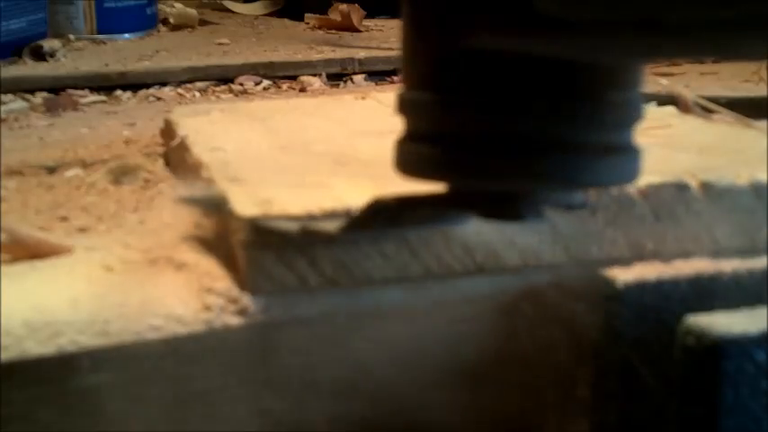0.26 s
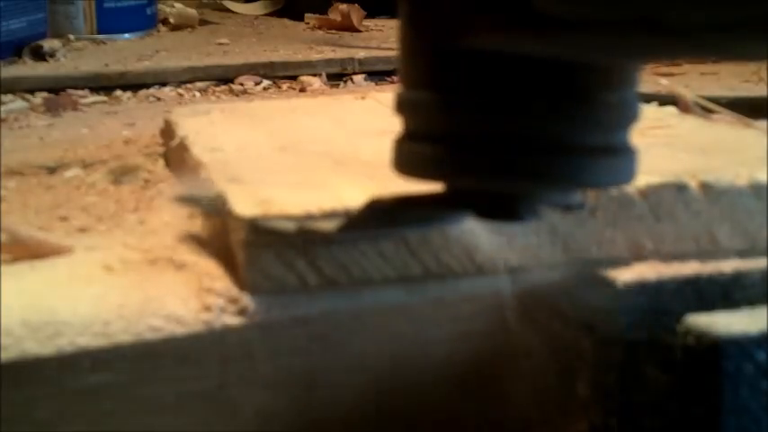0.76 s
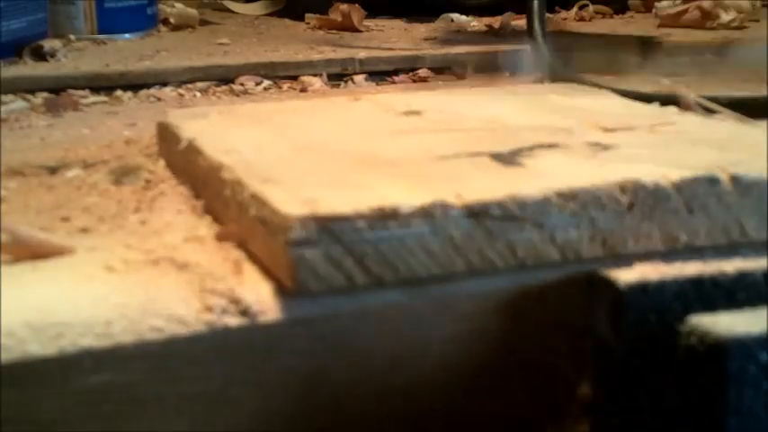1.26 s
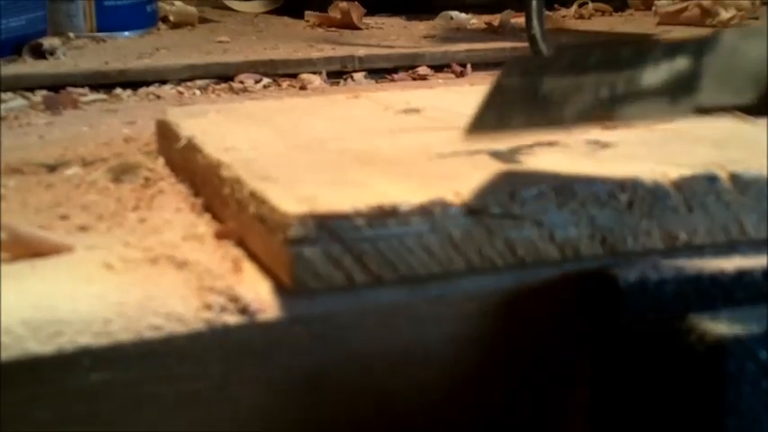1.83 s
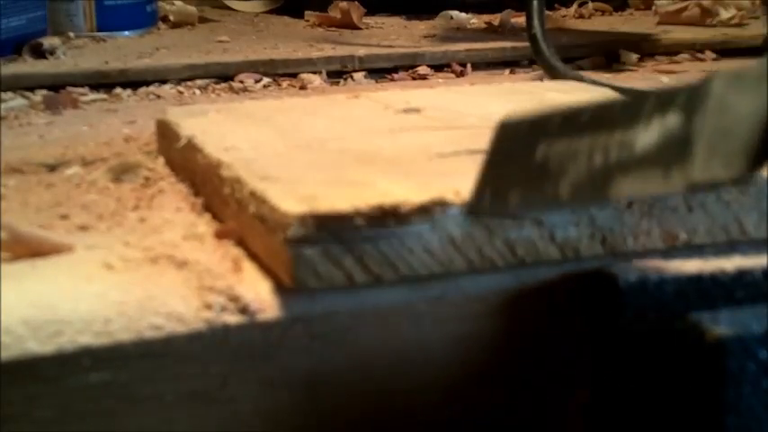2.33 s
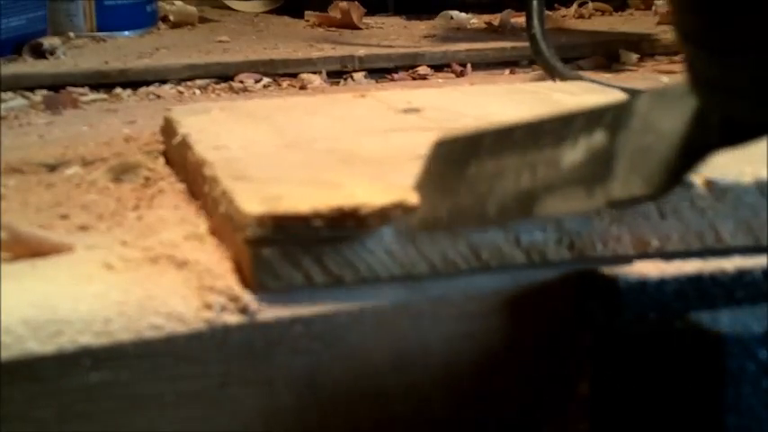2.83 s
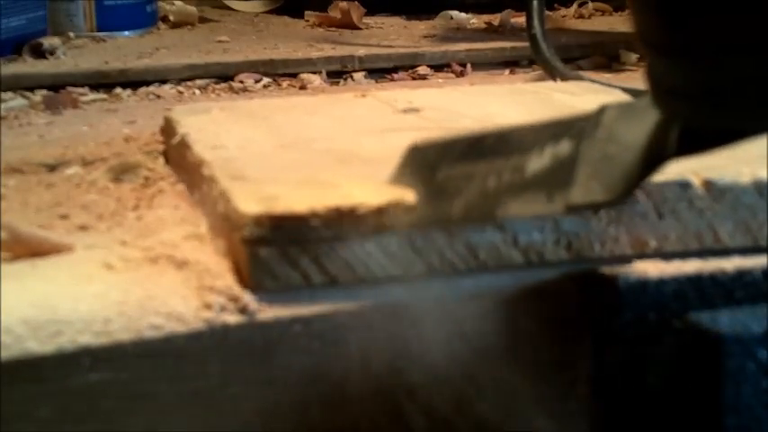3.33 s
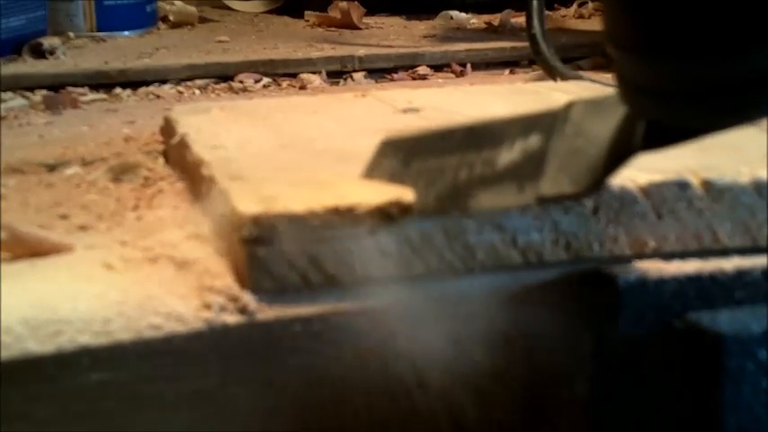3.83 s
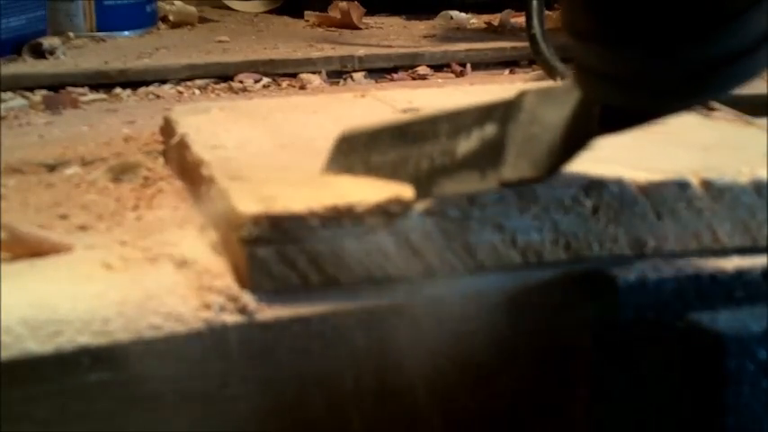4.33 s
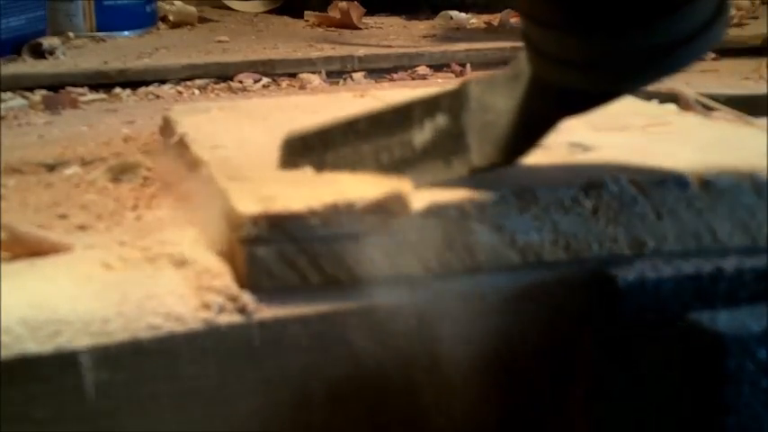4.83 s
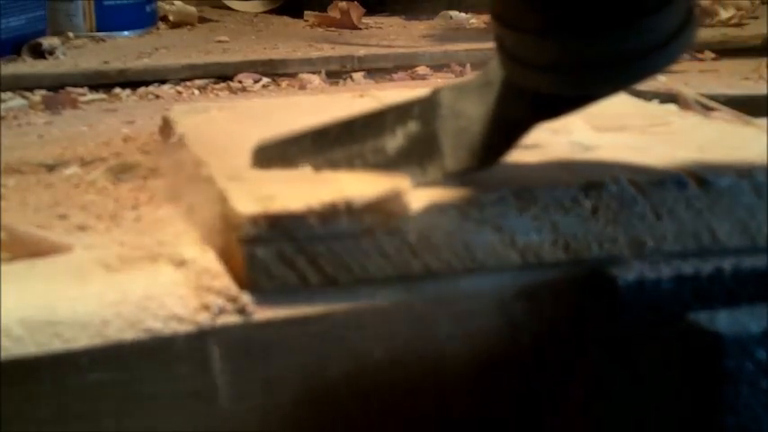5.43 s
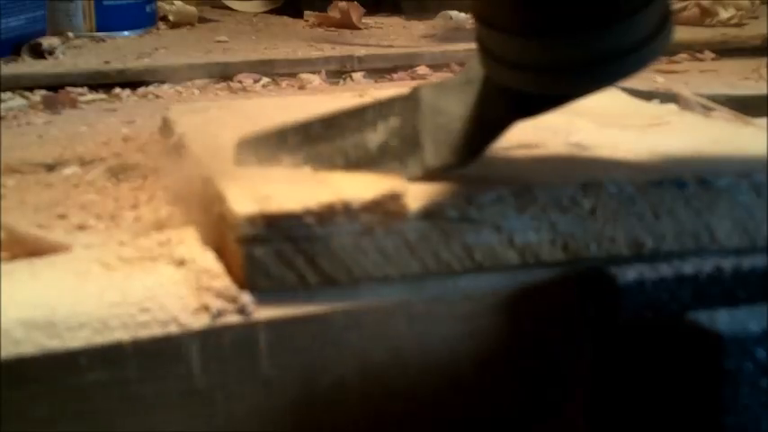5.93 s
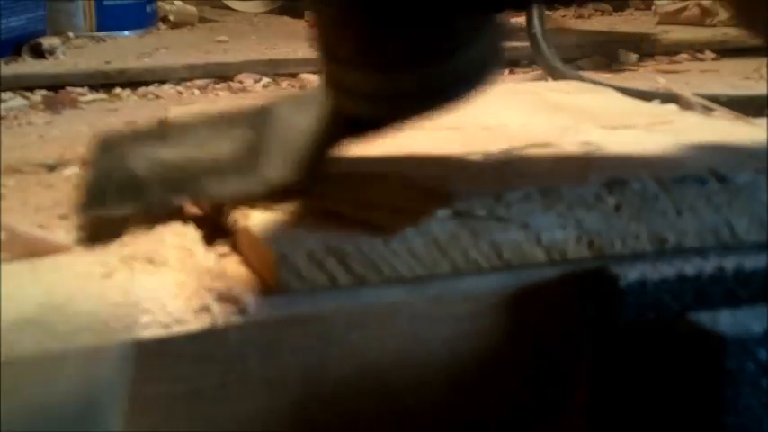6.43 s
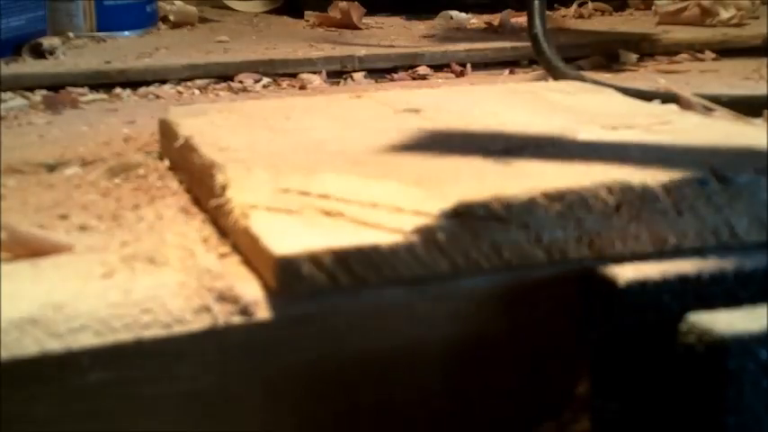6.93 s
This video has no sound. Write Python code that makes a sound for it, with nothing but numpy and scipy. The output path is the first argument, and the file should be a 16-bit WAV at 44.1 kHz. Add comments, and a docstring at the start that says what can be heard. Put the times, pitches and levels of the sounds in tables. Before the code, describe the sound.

A handheld power saw on a workshop bench, recorded dry and near: buzzing teeth and torn wood fibres, a short burst of low wind buffeting, smooth motor whine with rushing fan air, then a long chattering cut with metallic blade ring and loose slapping. The motor sags under pressure, races once clear, and finally falls in pitch after switch-off.

```python
"""An oscillating multi-tool saws a wooden block in three passes, close to the microphone: one from the side, then,
after the tool is lifted past the microphone and its cooling air buffets the port, a plunge and a deeper cut.
Motor orders hum and whine over fan noise, and the motor sags under load; at each stroke the teeth bite, with
torn fibres, ringing blade and wood, and slaps of the loose blade. Last, the tool is switched off and coasts down."""
import sys
import numpy as np
from scipy import signal
from scipy.fft import rfft, irfft, next_fast_len
from scipy.io import wavfile

SR = 44100
rng = np.random.default_rng(int(sys.argv[2]) if len(sys.argv) > 2 else 0)


def master(y):
    """Save y as 16-bit WAV."""
    cut = np.clip(np.atleast_2d(y).T, -1, 1)
    pcm = np.round(cut * 32767)  # scale
    wavfile.write(sys.argv[1], SR, pcm.astype(np.int16))


N = 316189
T = np.arange(N) / SR  # seconds

OFF_S = 6.842  # the switch is released
WHINE_RISE_S, WHINE_FALL_S = 0.026, 0.052  # widths of the soft edges of a swell
STROKE_SMEAR, SMEAR_PER_ORDER = 0.15, 0.011  # scatter in the timing of the orders (cycles); less makes a sharper pulse

# the blade skips, catching unevenly from stroke to stroke: start_s, stop_s, half_order_shift_db
SKIPS = [(0.194, 0.246, 4.5), (3.447, 4.232, 1), (4.398, 4.67, 3.5), (5.467, 6.278, -2.5)]


def gain_of(db):
    """Decibels to amplitude."""
    return np.exp(np.asarray(db) * np.log(10) / 20)


def evened(x):
    """Scales to rms 1."""
    return x / np.sqrt(np.mean(x ** 2) + 1e-20)


def follow(rows):
    """Each column of a curve table, sample by sample."""
    s, *columns = np.transpose(rows)
    return [np.interp(T, s, c) for c in columns]


def read(points, hz):
    """Gain of a short spectrum at the given frequencies, joined on a log frequency scale."""
    f, db = np.transpose(points)
    return gain_of(np.interp(np.log(hz + 1), np.log(f), db))


def filtered(x, response):
    """Applies a gain given as a function of frequency."""
    size = next_fast_len(N + 4096)
    spectrum = rfft(x, size) * response(np.fft.rfftfreq(size, 1 / SR))
    return irfft(spectrum, size)[:N]


def below(x, edge_hz):
    """Steep low-pass."""
    return filtered(x, lambda hz: 1 / (1 + (hz / edge_hz) ** 12))


def wander(rate):
    """Smooth chance of rms 1 that takes a new value rate times a second."""
    return evened(np.interp(T * rate, np.arange(16384), rng.standard_normal(16384)))


def contact(start, stop, release):
    """1 while the teeth are in the wood during one pass, else 0; they catch within 10 ms and ease off over release."""
    return np.clip(np.minimum((T - start) / .01, (stop - T) / release) + .5, 0, 1)


def swell(start, stop):
    """Rises before start, holds at 1, and fades after stop."""
    rise = (np.maximum(start - T, 0) / WHINE_RISE_S) ** 2
    fall = (np.maximum(T - stop, 0) / WHINE_FALL_S) ** 2
    return np.exp(-rise - fall)


def bump(s, width):
    """A bell of height 1 around one moment."""
    return np.exp(-((T - s) / width) ** 2)


def partial(turns, order):
    """One multiple of the shaft rotation, rms 1; low orders peak near one moment, so each stroke is a soft pulse."""
    scatter = STROKE_SMEAR + SMEAR_PER_ORDER * order
    return np.sqrt(2) * np.cos(2 * np.pi * (order * turns + scatter * rng.standard_normal()))


def saw(turns, load, cut, ring, jitter, skip_db, chatter_db, teeth_db):
    """One pass: the teeth bite at each stroke, a little early or late, and tear fibres in bursts."""
    # torn fibres against clean bites; grittiest for a moment early in the first pass
    # and midway through the last: time_s, grit_db
    grit_curve = [(0.13, 1), (0.21, 7.5), (0.3, 1), (0.55, 1), (0.85, -3), (3.3, 4), (3.6, -0.5), (4.6, 2),
                  (4.85, 3.5), (5.35, 0), (5.6, 6.5), (6.3, 3)]
    # the teeth catch (+) or slip (-): time_s, half_length_s, wood_db, blade_db
    catches = [(0.19, 0.018, -10, 1), (0.227, 0.034, 5.5, 5), (0.556, 0.45, -2, -3), (4.52, 0.37, 1.5, -2),
               (4.683, 0.066, 3, 4), (5.06, 0.99, -3.5, -0.5), (5.825, 0.27, 7, -1),
               (6.022, 0.071, -7.5, -14), (6.192, 0.14, 3.5, 0), (6.293, 0.014, -26, 5),
               (6.316, 0.016, -1.5, 6)]
    knock_growth, rasp_growth, ring_growth = 2.3, 2, -0.5  # dB per doubling of load
    skip_waver_db = 1.5
    bounce_rate = 19  # typical bounces of the tool in the cut per second
    start, stop, release, block_db, kerf_db, blade_db = cut

    stroke = turns + jitter * wander(420)
    # the grip on the blade keeps changing, so single orders surge and fade
    bites = evened(sum(partial(stroke, k) * gain_of(2.5 * np.tanh(wander(14))) for k in range(2, 27)))
    # a blade that catches harder on every second stroke adds half orders
    skips = evened(bites * np.cos(np.pi * stroke))
    skipping_db = skip_waver_db * wander(2.9) + sum(db * swell(first, last) for first, last, db in SKIPS)

    burst = np.exp(0.85 * np.cos(2 * np.pi * turns))
    grit = rng.standard_normal(N) * burst * gain_of(2.5 * np.tanh(wander(500)))
    # torn fibres have little bass
    grit = evened(filtered(grit, lambda hz: np.hypot(hz, 900) / np.hypot(hz, 3000)))
    tearing = gain_of(follow(grit_curve)[0])
    drive = (bites + gain_of(skip_db + skipping_db) * skips + tearing * grit) / np.hypot(1, tearing)

    sound = filtered(drive, lambda hz: read(ring, hz))
    low, mid, high = (below(sound, edge_hz) for edge_hz in (1450, 3050, 4200))
    # the wood gets louder with load, while the blade rings much the same at any pressure
    doublings = np.log2(load)
    wood, steel = sum(np.outer(dbs, bump(s, width)) for s, width, *dbs in catches)
    block = block_db + knock_growth * doublings + wood
    kerf = kerf_db + rasp_growth * doublings + 0.54 * wood
    blade = blade_db + ring_growth * doublings + steel
    # the hand-held tool bounces in the cut at an uneven rate, which makes the ringing stutter
    bounces = np.cumsum(bounce_rate * np.exp(.5 * wander(25))) / SR
    chatter = chatter_db * np.sin(2 * np.pi * bounces)

    out = evened(low) * gain_of(block)
    out += evened(mid - low) * gain_of(kerf + 1.85 * chatter)
    out += evened(high - mid) * gain_of(blade + chatter)
    out += evened(sound - high) * gain_of(kerf + teeth_db + chatter)
    return out * np.sqrt(contact(start, stop, release))


def rattle(turns):
    """The loose blade slaps the kerf once a stroke, unevenly; each slap rings briefly in blade or wood."""
    # spells of slapping and the resonance they set ringing: start_s, stop_s, resonance_hz, width_hz, level_db
    rattles = [(0.206, 0.303, 2900, 1300, -32), (2.407, 2.55, 3670, 200, -35),
               (2.717, 3.273, 3610, 300, -33), (3.27, 3.31, 2660, 220, -29.5),
               (3.328, 3.37, 3670, 300, -26), (3.366, 3.41, 2660, 216, -33), (3.62, 4.62, 3550, 810, -34.5),
               (4.62, 6.27, 2906, 1130, -36.5), (4.614, 5.56, 4720, 700, -35),
               (4.777, 5.25, 2585, 220, -41), (5.25, 6.2, 3530, 547, -35.5),
               (5.05, 5.357, 10800, 1500, -61.5), (6.31, 6.33, 2820, 1100, -30)]
    spread_db, clump_db, clump_rate = 3, 4.5, 45  # slaps differ in strength and come in clumps (changes per second)
    scatter = 0.015  # unevenness of timing (strokes)
    strokes = np.floor(np.maximum.accumulate(turns + scatter * wander(420)))
    size_db = spread_db * np.tanh(rng.standard_normal(N)) + clump_db * np.tanh(wander(clump_rate))
    slaps = np.diff(strokes, prepend=strokes[0]) * gain_of(size_db)

    out = np.zeros(N)
    for start, stop, f, width, db in rattles:
        def resonance(hz):
            """A band-pass applied twice, with the treble above it rolled off."""
            band = 1j * hz * width / (f * f - hz * hz + 1j * hz * width)
            return band ** 2 / (1 + (hz / (2 * f)) ** 6)
        out += gain_of(db) * evened(filtered(slaps, resonance)) * contact(start, stop, 0.033)
    return out


def rocking(turns):
    """While the blade skips, the block rocks at half the stroke rate; as the kerf opens it drones below the hum."""
    # rocking at 1/2, 3/2 and 5/2 of the stroke rate, before the shift of each skip: level_db
    rock_levels = (-62.5, -58.5, -51)
    # the drone as the kerf opens: start_s, stop_s, level_db
    drone = (2.6, 2.78, -57)
    level = sum(gain_of(db) * swell(start, stop) for start, stop, db in SKIPS)
    halves = level * sum(gain_of(db + 1.2 * wander(25)) * partial(turns, k + .5)
                         for k, db in enumerate(rock_levels))
    start, stop, db = drone
    return halves + gain_of(db) * swell(start, stop) * partial(turns, 2 / 3)


def motor(speed, turns, shade_db, grip):
    """Orders of the motor; the drive swings to and fro, which favours odd orders, and bearing play makes them waver."""
    # hum at the stroke rate: time_s, level_db
    hum = [(0, -42.5), (0.8, -42), (1.3, -42.5), (2.85, -45), (3.25, -59), (4.6, -51.5), (4.85, -51),
           (5.75, -44.5), (6.22, -50), (6.29, -51), (6.38, -45), (7.17, -51)]
    # weaker orders, raised by a housing resonance near 3.7 kHz: pitch_hz, odd_order_level_db (before the shifts below)
    gears = [(520, -87), (700, -45), (900, -52), (1300, -55.5), (2100, -57), (2500, -43.5), (3100, -48.5),
             (3700, -37.5), (4700, -43), (5850, -55), (6600, -52), (7700, -62.5), (9400, -82), (11000, -74),
             (15000, -88)]
    # one order sings out as the tool is turned or leant on: start_s, stop_s, order, level_db
    whines = [(0.0, 0.133, 6, -40), (0.0, 0.146, 8, -29.5), (0.262, 0.438, 6, -41), (0.266, 0.417, 8, -31),
              (0.31, 0.383, 13, -32.5), (0.446, 0.567, 9, -34), (0.48, 0.59, 14, -32),
              (0.63, 0.765, 8, -31), (0.636, 0.79, 12, -33.5), (0.843, 0.93, 13, -29.5),
              (1.205, 2.353, 9, -40), (1.203, 1.28, 11, -35), (1.344, 2.373, 11, -31),
              (1.748, 2.383, 21, -41.5), (1.8, 2.8, 30, -62.5), (1.35, 2.8, 34, -69), (2.51, 2.56, 11, -31),
              (4.355, 4.503, 4, -43), (4.687, 4.75, 9, -34), (4.848, 5.2, 9, -41.5), (5.92, 6.017, 9, -35),
              (5.996, 6.11, 13, -33), (6.335, 6.54, 11, -31), (6.283, 6.4, 13, -32.5),
              (6.425, 6.603, 22, -46.5), (6.42, 6.6, 30, -61), (6.6, 6.747, 7, -37.5),
              (6.438, 6.846, 12, -34.5), (6.66, 6.878, 13, -28)]
    # each coasting order flares as it sinks through a housing resonance: resonance_hz, width_hz, boost_db
    housing = [(1750, 220, 13), (2670, 180, 7), (3610, 390, 17.5)]
    waver_db, even_db, damped_db, jolt_db = 5.5, -3.5, -9, 4.5
    flutter, cut_flutter = 0.018, 0.2  # flicker of the whines, and what the wood adds: shares of their level
    shake = 0.0015  # turns
    fan_blades, fan_tone_db = 21, -54.5
    coast_db = -4  # unpowered, the slack drive is quieter
    sizzle_order, sizzle_width, sizzle_db = 46, 5, 10  # these orders stand out and sweep down in the coast

    hum_db, = follow(hum)
    shaken = turns + shake * grip * wander(160)  # the wood jolts the drive and smears the high orders
    out = gain_of(hum_db + .5 * jolt_db * grip * wander(35)) * partial(shaken, 1)
    coasting = swell(OFF_S, T[-1])
    for k in range(2, 53):
        hz = k * speed
        treble = hz > 5300
        slack_db = coast_db + sum(db * np.exp(-((hz - f) / width) ** 2) for f, width, db in housing if k < 20)
        slack_db += sizzle_db * np.exp(-((k - sizzle_order) / sizzle_width) ** 2)
        shift_db = shade_db * treble + even_db * (k % 2 == 0) * (1 + 2 * coasting)
        # load takes up the play in the drive and quiets its weaker orders
        shift_db += damped_db * grip + slack_db * coasting
        level = read(gears, hz) * gain_of(waver_db * np.tanh(wander(7)) + shift_db)
        if k == fan_blades:
            level = np.hypot(level, gain_of(fan_tone_db + shade_db))
        sung = [gain_of(db) * swell(start, stop) for start, stop, order, db in whines if round(order) == k]
        if sung:
            whine = sum(sung) * gain_of(jolt_db * grip * np.tanh(wander(35)))
            flicker = 1 + (flutter + cut_flutter * grip) * wander(110)
            level = np.hypot(level, whine) * flicker
        out += level * partial(shaken, k)
    return out


def fan(turns, shade_db, rattle_depth=0.2, knock_depth=0.2):
    """Rushing air and gear rattle, which throbs two and four times a turn as the drive reverses."""
    # colour of the cooling fan's rush: pitch_hz, relative_level_db_per_hz
    rush_colour = [(100, -18.5), (300, -16), (700, -5), (1600, -0.5), (2200, -0.5), (3600, 5.5),
                   (4500, 5.5), (4900, 4.5), (5400, -5.5), (6700, -9.5), (7700, -25), (9400, -22.5),
                   (12000, -25.5), (15000, -40)]
    # loudness of the rush, before the treble is shaded: time_s, level_db
    rush_curve = [(0, -32.5), (0.55, -44.5), (0.85, -31), (1.06, -38), (1.28, -30.5), (1.8, -34),
                  (2.7, -33.5), (3.2, -35), (5.25, -36), (5.7, -32.5), (6.4, -34.5), (7.17, -35.5)]
    throb = 1 + rattle_depth * np.cos(4 * np.pi * turns) + knock_depth * np.cos(8 * np.pi * turns)
    noise = rng.standard_normal(N) * throb * gain_of(1.1 * wander(240))
    rush_db, = follow(rush_curve)
    rush = evened(filtered(noise, lambda hz: read(rush_colour, hz))) * gain_of(rush_db)
    dull = below(rush, 5500)
    return dull + (rush - dull) * gain_of(shade_db)


def draught():
    """Lumpy turbulence of cooling air on the port: only strong gusts reach far beyond the bass; a pop breaks out in one."""
    # cooling air sweeps over the microphone: start_s, stop_s, level_db
    gusts = [(0, 0.057, -39), (0.05, 0.85, -52.5), (0.933, 0.95, -19.5), (0.955, 1.015, -24),
             (1.025, 1.097, -27), (1.093, 1.153, -22.5), (1.174, 1.16, -24.5), (1.606, 1.6, -44),
             (6.84, 7, -48)]
    # colour of the turbulence: pitch_hz, relative_level_db_per_hz
    buffet = [(15, 0.5), (40, 2.5), (100, -8), (200, -10.5), (400, -17), (900, -26.5), (2000, -54),
              (5000, -64)]
    rise, fall = 259, 221  # dB per second
    pop_s, pop_db, pop_length_s = 1.1326, -10.5, 0.00033  # one sharp pop of air on the port

    slopes_db = [db - rise * np.maximum(start - T, 0) - fall * np.maximum(T - stop, 0)
                 for start, stop, db in gusts]
    level_db = np.max(slopes_db, axis=0)
    eddies = evened(filtered(rng.standard_normal(N), lambda hz: read(buffet, hz)))
    bass = below(eddies, 160)
    fine = eddies - bass
    force = np.clip(gain_of((level_db + 8.0) * 0.29), 0, 1)
    out = (2 * np.tanh(bass / 2) + fine * force * gain_of(6.2 * wander(90))) * gain_of(level_db)
    u = np.maximum(T - pop_s, 0) / pop_length_s
    return out - gain_of(pop_db) * u * np.exp(1 - u) * (1 - u / 3)


def scene():
    """One shaft drives motor, fan and blade; it sags with load and coasts down once switched off."""
    # speed under power, sagging as the blade is pressed into the wood: time_s, strokes_per_s
    speed_curve = [(0.0, 292.1), (0.08, 295.4), (0.21, 279.5), (0.36, 295.1), (0.52, 272.0), (0.65, 286.5),
                   (0.76, 288.6), (0.91, 306.0), (1.6, 309.0), (2.4, 309.0), (2.78, 304.0), (2.98, 297.3),
                   (3.11, 300.5), (3.28, 293.5), (3.49, 297.1), (4.3, 293.2), (4.44, 297.5), (4.68, 284.0),
                   (4.87, 279.0), (5.06, 289.2), (5.17, 284.0), (5.37, 282.3), (5.58, 287.2), (5.87, 286.0),
                   (6.0, 281.0), (6.16, 295.5), (6.26, 283.0), (6.37, 305.0), (6.47, 310.0), (6.84, 308.1)]
    # blade passes, levels at full load: start_s, stop_s, easing_off_s, block_knock_db, kerf_rasp_db, blade_ring_db
    passes = [(-0.05, 0.86, 0.087, -41, -33, -34.5), (2.4, 4.62, 0.021, -42.5, -34, -31.5),
              (4.62, 6.335, 0.0082, -41.5, -33.5, -38.5)]
    # how blade and wood ring in each pass: pitch_hz, relative_level_db_per_hz
    ring_side = [(150, -62), (580, -12.5), (850, -9.5), (1450, -5), (1720, 1), (2020, 2), (2420, 5),
                 (3080, -9.5), (3550, -7.5), (4900, -20.5), (5500, -32), (6700, -30), (7700, -44),
                 (15000, -50)]
    ring_plunge = [(150, -46), (750, 5), (1200, -4), (2100, -2.5), (2650, 1), (3200, 1.5), (3550, 5.5),
                   (3850, 5.5), (4700, -11.5), (5800, -50), (6700, -15.5), (7700, -40), (15000, -52)]
    ring_deep = [(60, -25), (200, -9.5), (850, -7.5), (1150, -3), (1700, -10), (2250, 1), (2600, 3.5),
                 (3100, 3), (3550, 13), (4750, 6), (5500, -13.5), (6800, -16), (7700, -25), (10500, -26.5),
                 (15000, -47)]
    free_speed, full_sag = 310, 20  # strokes per second
    coast_s = 0.955  # time constant of the slowing
    wobble_hz, wobble_rate = 1.0, 16  # the speed wobbles during the plunge: depth, and changes per second
    treble_db, treble_loaded_db = 2.5, -1.5  # treble of the free-running tool, and its change at full load
    swing_s, swing_width_s, swing_shade_db = 1.04, 0.15, -11.5

    side, plunge, deep = passes
    powered, = follow(speed_curve)
    speed = powered * np.exp(-np.maximum(T - OFF_S, 0) / coast_s)
    speed += wobble_hz * wander(wobble_rate) * contact(*plunge[:3])
    turns = np.cumsum(speed) / SR
    load = np.maximum(free_speed - powered, 1) / full_sag
    grip = 0.6 * contact(*side[:3]) + contact(*plunge[:3]) + contact(*deep[:3])
    # the tool's body shades its treble as it swings past the microphone
    shade_db = treble_db + treble_loaded_db * load + swing_shade_db * bump(swing_s, swing_width_s)

    # jitter in strokes
    out = saw(turns, load, side, ring_side, jitter=0.003, skip_db=-11.5, chatter_db=0.2, teeth_db=-4.0)
    out += saw(turns, load, plunge, ring_plunge, jitter=0.0026, skip_db=-14, chatter_db=0.83, teeth_db=2.0)
    out += saw(turns, load, deep, ring_deep, jitter=0.0073, skip_db=-15.5, chatter_db=0.8, teeth_db=-1.0)
    out += rattle(turns) + rocking(turns)
    out += motor(speed, turns, shade_db, grip) + fan(turns, shade_db)
    return (out + draught())[None]


def record(dry):
    """The microphone port cuts narrow nulls into the treble; then the band limit."""
    # nulls of the microphone port: pitch_hz, width_hz
    nulls = [(4210, 570), (7900, 790), (8770, 210), (12600, 210)]
    edge_hz = 15300

    def port(hz):
        """Product of all the notches."""
        return np.prod([abs(hz - f) / np.hypot(hz - f, width) for f, width in nulls], axis=0)

    fade = np.clip(np.minimum(T, T[-1] - T) / .003, 0, 1)  # 3 ms at both ends
    heard = filtered(dry[0] * fade, port)
    band_limit = signal.firwin(801, edge_hz, window=("kaiser", 9), fs=SR)
    return signal.oaconvolve(heard, band_limit, "same")[None]


dry = scene()
out = record(dry)
master(out)
```